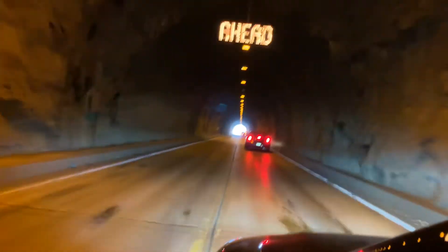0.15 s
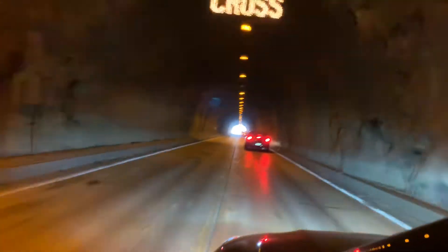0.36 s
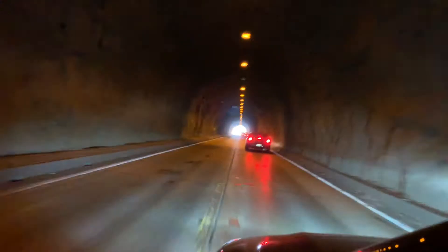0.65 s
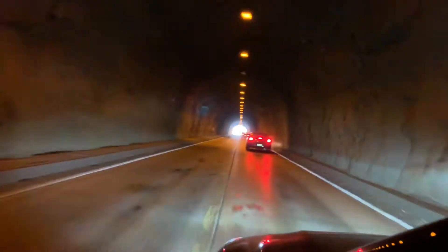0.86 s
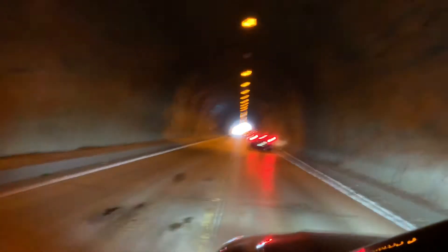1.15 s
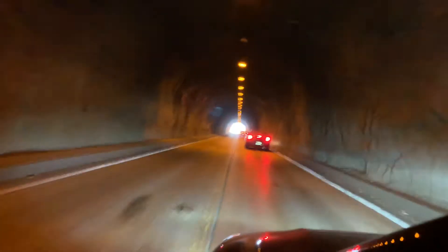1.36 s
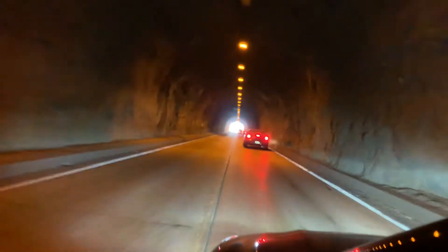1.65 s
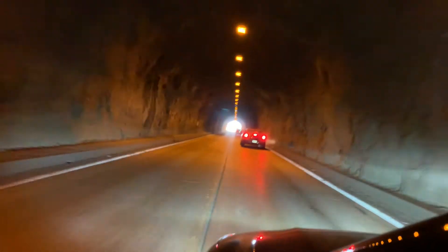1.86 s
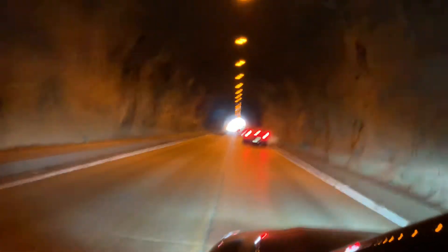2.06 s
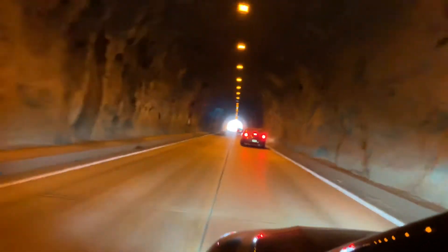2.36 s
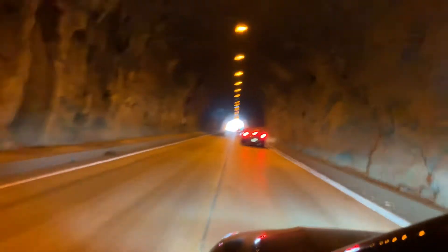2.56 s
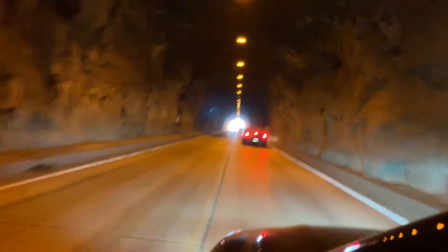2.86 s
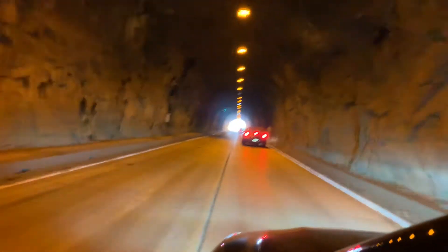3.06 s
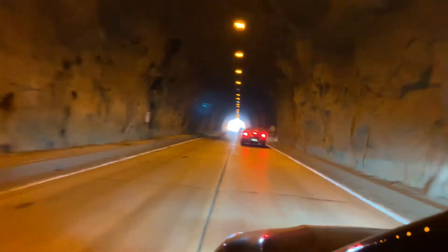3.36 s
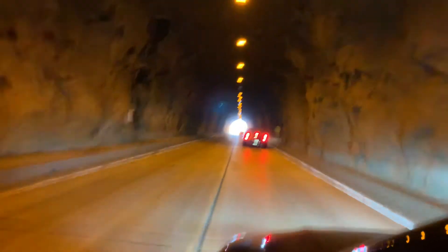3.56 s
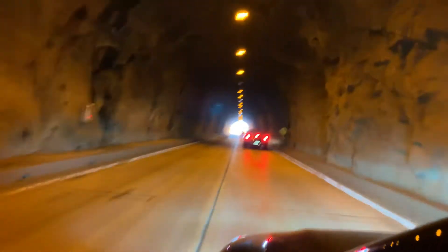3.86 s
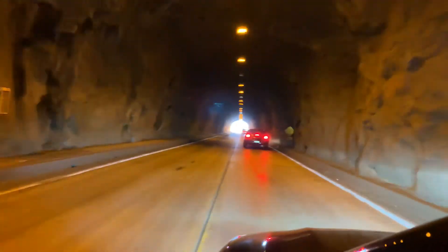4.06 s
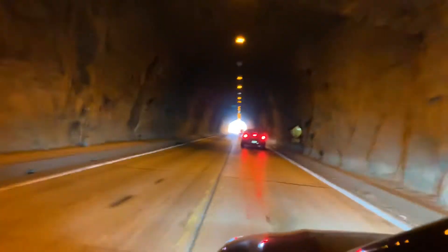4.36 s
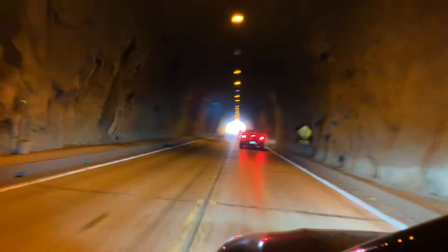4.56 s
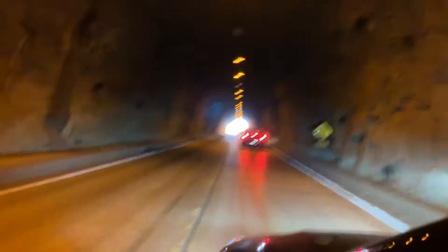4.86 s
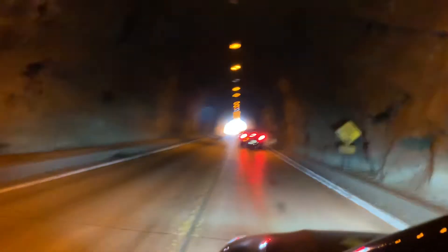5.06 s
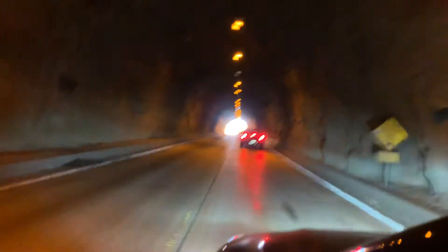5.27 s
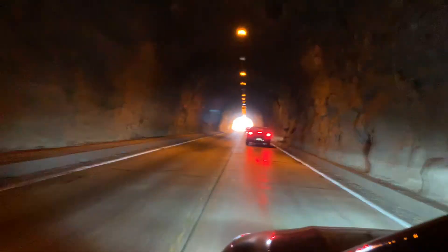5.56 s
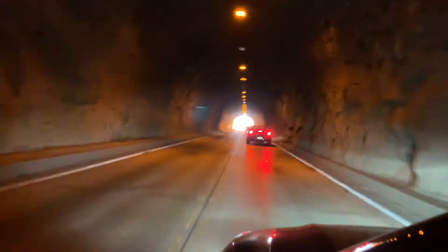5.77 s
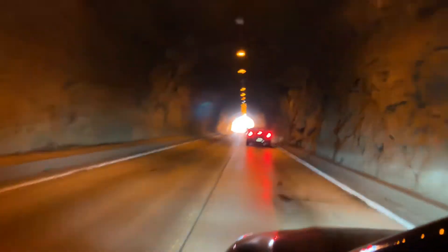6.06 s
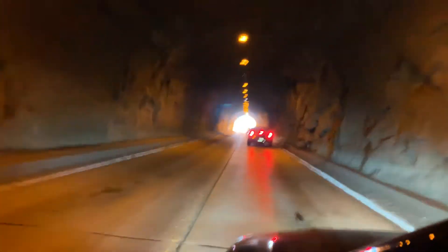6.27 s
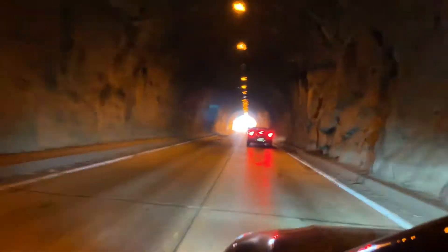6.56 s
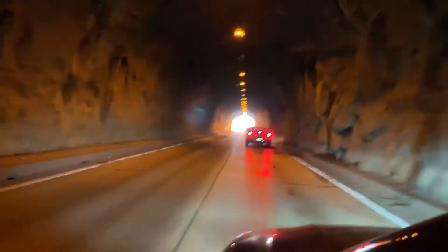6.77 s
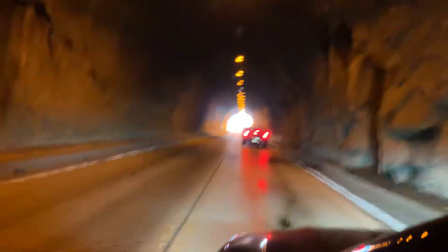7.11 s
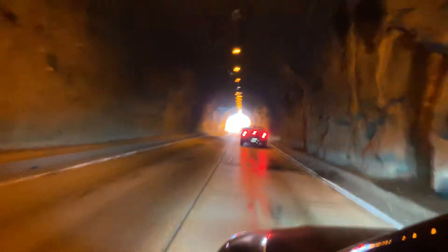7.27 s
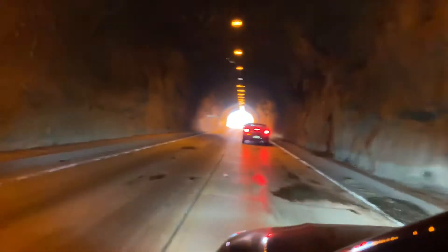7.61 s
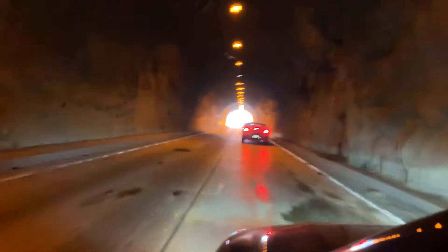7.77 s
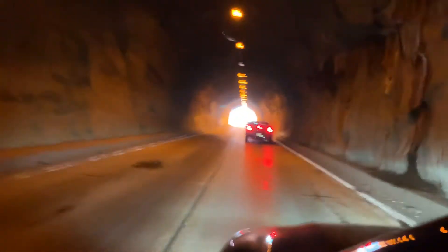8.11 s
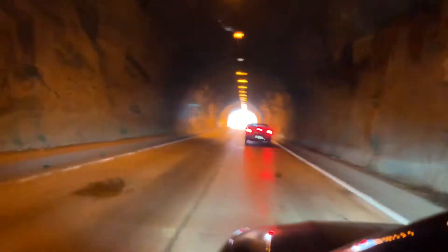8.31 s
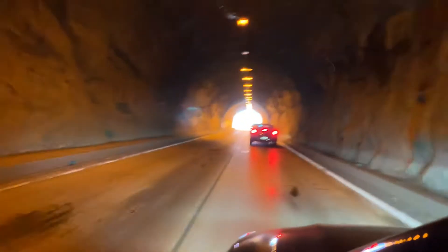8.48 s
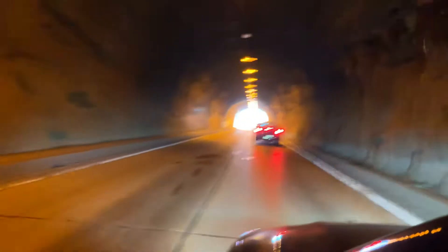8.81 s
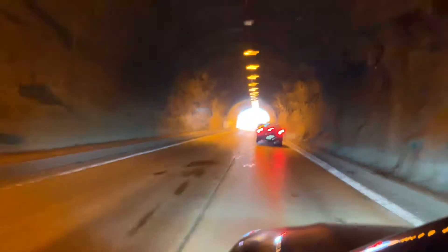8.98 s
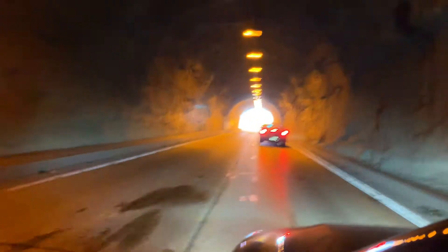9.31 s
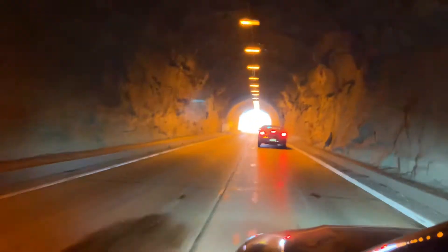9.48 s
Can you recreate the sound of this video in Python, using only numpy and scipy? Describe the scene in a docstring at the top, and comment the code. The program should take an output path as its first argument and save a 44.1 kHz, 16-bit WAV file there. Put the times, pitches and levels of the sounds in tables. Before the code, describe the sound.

Ragged wind batters a microphone on the outside of a moving car, with deep rumble, quick thumps and a thin high hiss that rises with the gusts. Behind it, tyres and engine blend into an even roar reflected by the tunnel walls. Sharp crackling snaps mark the hardest hits, the strongest about two and a half and six seconds in. Tiny dry ticks of grit are barely heard from about three seconds on.

```python
"""Slipstream buffets a microphone outside a car in a rock tunnel: low lumps, gusts, a thin whistle past
the port and short eddies that drop in pitch, some of the hardest with a snap of the diaphragm.
Fine grit ticks on the housing. Tyre and engine roar comes back off the walls as a smooth wash."""
import sys
import numpy as np
from scipy import signal
from scipy.fft import rfft, irfft, next_fast_len
from scipy.io import wavfile
from scipy.ndimage import uniform_filter1d, minimum_filter1d, map_coordinates

SR = 44100
rng = np.random.default_rng(int(sys.argv[2]) if len(sys.argv) > 2 else 0)


def pcm_store(signal):
    """Save signal as 16-bit PCM."""
    levels = np.round(np.clip(np.atleast_2d(signal), -1, 1) * 32767)
    wavfile.write(sys.argv[1], SR, levels.astype(np.int16).T)


N = 425565


def amp(db):
    """Decibels to gain."""
    return 10 ** (np.asarray(db) / 20)


def unit(x):
    """x at rms 1."""
    return x / np.sqrt(np.mean(x ** 2) + 1e-20)


def curves(rows):
    """Per-sample curve for each column after time_s."""
    time_s, *columns = np.transpose(rows)
    return [np.interp(np.arange(N) / SR, time_s, column) for column in columns]


def wobble(rate_hz):
    """Smooth random curve, rate_hz knots a second."""
    knots = rng.standard_normal(int(N * rate_hz / SR) + 4)
    return map_coordinates(knots, [np.arange(N) * rate_hz / SR])


def filtered(x, response):
    """FFT filter with gain response(hz)."""
    size = next_fast_len(N + 8192)
    return irfft(rfft(x, size) * response(np.fft.rfftfreq(size, 1 / SR)), size)[..., :N]


def band(hz, centre_hz, width_hz):
    """Response of one resonance."""
    return 1j * hz * width_hz / (centre_hz ** 2 - hz ** 2 + 1j * hz * width_hz)


def rush(spectrum, patchy_db):
    """Shaped noise at rms 1, with random gain patches in time and frequency."""
    bins = signal.stft(rng.standard_normal(N + 512), nperseg=512)[2]
    patches = uniform_filter1d(rng.standard_normal(bins.shape), size=8, axis=0)
    patches = uniform_filter1d(patches, size=6, axis=1)
    noise = signal.istft(bins * amp(patchy_db * unit(patches)), nperseg=512)[1][:N]
    freq_hz, density_db = np.transpose(spectrum)
    response = lambda hz: amp(np.interp(np.log(hz + 1), np.log(freq_hz + 1), density_db, -120, -120))
    return unit(filtered(noise, response))


def click_envelope(t60_s):
    """Fast rise, exponential decay: 400 samples, peak 1."""
    t = np.arange(400) / SR
    envelope = amp(-60 * t / t60_s) * (1 - np.exp(-t / .0007))
    return envelope / envelope.max()


def road_and_buffet(flow):
    """Tyre and engine noise, steady as a tunnel's wash, over low lumps of air pressure."""
    drive = [(0.0, -26, -39, -19), (0.9, -25.5, -38.5, -19), (2.1, -25, -39.5, -17.5),
             (3.15, -25.5, -39.5, -19), (4.5, -24.5, -39, -18.5), (5.1, -23, -39.5, -17.5),
             (5.6, -25, -39.5, -17.5), (6.0, -24.5, -38.5, -16.5), (6.9, -25.5, -41, -18.5),
             (8.8, -26.5, -46, -19.5), (9.65, -26.5, -46, -19)]  # time_s, roar_db, tyre_db, buffet_db
    # freq_hz, density_db
    roar_spectrum = [(60, -59), (150, -11.5), (300, -2), (600, -3.5), (1100, -1), (1500, -5), (2100, -8.5),
                     (3200, -24), (5000, -45)]
    tyre_spectrum = [(1200, -38), (2100, 2.5), (3200, -4), (4200, -9.5), (5500, -20.5), (9000, -46.5)]
    buffet_spectrum = [(12, -42), (22, -7.5), (35, -3), (54, -1), (75, -3.5), (130, -6.5), (300, -14.5),
                       (700, -34)]
    roar_db, tyre_db, buffet_db = curves(drive)
    roar = amp(roar_db + .43 * flow) * rush(roar_spectrum, patchy_db=.42)
    tyres = amp(tyre_db + .39 * flow + .26 * wobble(11)) * rush(tyre_spectrum, patchy_db=.94)
    buffet = amp(buffet_db + .68 * flow) * rush(buffet_spectrum, patchy_db=.62)
    return roar + tyres + buffet


def grit_ticks():
    """Grit hits the housing: dry treble ticks."""
    impacts = [(3.1108, -54), (3.3149, -54), (3.4635, -54), (3.4845, -52), (3.539, -52), (4.4009, -55),
               (4.5052, -53), (5.9803, -49), (6.4837, -55), (6.9057, -53), (6.9396, -52), (7.3826, -55),
               (7.5627, -52), (8.1215, -46), (8.1798, -52), (8.3983, -56), (9.0109, -52), (9.3891, -52),
               (9.3955, -52)]  # start_s, level_db
    grit = np.zeros(N + 400)
    for start_s, level_db in impacts:
        tick = amp(level_db) * click_envelope(t60_s=.009) * rng.choice([-1, 1], 400)
        grit[round(start_s * SR):][:400] += tick
    return filtered(grit[:N], lambda hz: band(hz, 11000, 12000) ** 3)


def diaphragm_snaps():
    """Each snap rings the port for a few unsteady cycles, with a rattle on top."""
    snaps = [(2.384, -8.5, 2490, -21), (2.389, -15, 1980, -15), (2.398, -32, 2400, -14),
             (2.41, -13.5, 1510, -22), (3.539, -18, 1500, -20), (5.576, -17, 1290, -30),
             (5.7678, -22, 3360, -19), (5.793, -20, 2340, -16), (5.9805, -9, 2290, -18),
             (5.989, -19, 3300, -23), (5.9928, -20.5, 4230, 1.5), (5.9949, -15, 2140, -22),
             (8.8179, -15, 2410, -19.5)]  # start_s, level_db, ring_hz, rattle_rel_db
    ring, rattle = np.zeros((2, N + 400))
    t = np.arange(400) / SR
    for start_s, level_db, ring_hz, rattle_rel_db in snaps:
        at = round(start_s * SR)
        tone = np.sin(2 * np.pi * ring_hz * t + np.cumsum(rng.normal(0, .3, 400)))
        noise = rng.choice([-1, 1], 400)
        ring[at:at + 400] += amp(level_db) * click_envelope(t60_s=.012) * tone
        rattle[at:at + 400] += amp(level_db + rattle_rel_db) * click_envelope(t60_s=.0096) * noise
    return (filtered(ring[:N], lambda hz: 1 / (1 + (hz / 5500) ** 8))
            + filtered(rattle[:N], lambda hz: band(hz, 4600, 6000) ** 2 / (1 + (hz / 8500) ** 12)))


def gust_levels():
    """Turbulence and whistle levels in dB: each gust swells, holds and dies over the breeze."""
    breeze = [(0.0, -25, -58), (0.5, -30.5, -57.5), (0.8, -24.5, -54.5), (1.2, -32.5, -58.5),
              (1.8, -23, -55), (2.4, -31.5, -57), (3.0, -24.5, -54.5), (3.45, -29.5, -58),
              (3.8, -26.5, -55), (4.5, -28.5, -56.5), (4.95, -23.5, -53), (5.2, -27, -57),
              (5.85, -26.5, -53.5), (6.4, -21, -55), (6.95, -27, -57.5), (7.45, -25, -57.5),
              (7.9, -29.5, -62), (8.5, -24.5, -61), (9.1, -29, -60), (9.65, -33, -60.5)]  # time_s, turbulence_db, whistle_db
    gusts = [(0.04, -17, 10, 42, 5), (0.36, -22, 17, 100, 4), (0.66, -11, 12, 19.5, 5),
             (0.83, -25, 30, 60, 3.5), (1.25, -20.5, 50, 91, 3), (1.52, -13.5, 8.3, 40, 3.5),
             (1.79, -23, 15, 50, 1), (1.96, -20, 38, 74, 0.5), (2.38, -14.5, 16, 28, 2),
             (2.56, -19.5, 44, 80, 0.5), (3.16, -27.5, 22, 120, -1), (3.525, -12, 45, 30, 9),
             (3.67, -21.5, 10, 70, -2), (3.75, -21.5, 57, 92, 2.5), (4.29, -20.5, 17, 27, 3),
             (4.44, -21, 20, 120, 1.5), (5.08, -17, 16, 28, 2), (5.27, -13.5, 40, 27, 3.5),
             (5.5, -23.5, 20, 52, 0.5), (5.78, -14.5, 30, 35, 2.5), (5.984, -4.5, 11, 18, -2),
             (6.02, -15, 25, 59, 2.5), (6.98, -15.5, 25, 50, 4), (7.57, -15.5, 8.4, 15, 0),
             (7.72, -21, 10, 120, 1), (8.024, -14, 106, 21, 3), (8.158, -16.5, 17, 18, 6),
             (8.64, -20, 15, 70, 0), (8.8, -26, 25, 80, 0.5), (9.0, -19, 31, 35, 3),
             (9.38, -23, 62, 30, 0.5)]  # peak_s, level_db, hold_ms, fall_10db_ms, whistle_lift_db
    rise_to_fall = .41
    breeze_db, whistle_db = curves(breeze)
    power, t = amp(2 * breeze_db), np.arange(N) / SR
    for peak_s, level_db, hold_ms, fall_10db_ms, lift_db in gusts:
        away_s = np.maximum((peak_s - t) / rise_to_fall, t - peak_s - hold_ms / 1000)
        drop_db = 10 * np.maximum(0, away_s) / (fall_10db_ms / 1000)
        power = power + amp(2 * (level_db - drop_db))
        whistle_db = whistle_db + lift_db * amp(-drop_db)
    return 10 * np.log10(power), whistle_db


def port_whistle(whistle_db, flow, ragged):
    """Air past the port: a thin hiss, with the finest jets fizzing in spurts."""
    # freq_hz, density_db
    hiss_spectrum = [(2500, -17.5), (4500, -1.5), (6000, -3), (8000, -5.5), (9500, -14.5), (11000, -28)]
    fizz_spectrum = [(6000, -20), (9000, 0), (11000, -1.5), (14500, -1.5), (16000, -5.5)]
    hiss = unit(amp(.5 * ragged + 1.4 * flow) * rush(hiss_spectrum, patchy_db=1.3))
    fizz = unit(amp(1.8 * flow + .6 * wobble(20)) * rush(fizz_spectrum, patchy_db=1.0))
    return amp(whistle_db) * hiss + amp(whistle_db - 19.5) * fizz


def vortices(peak_s, level_db, pitch_hz, length_s, fall, rough_rad):
    """Pressure of passing vortices: a few torn cycles, dropping in pitch as each vortex widens."""
    offsets = np.arange(-500, 1300)
    age = offsets / SR / length_s[:, None]  # in lengths from the peak
    taper = np.hanning(2600)[800:]
    envelope = np.exp(-3 * np.minimum(age, 0) ** 2) / (1 + 2 * np.maximum(age, 0) ** 2) * taper
    cycles = (pitch_hz * length_s)[:, None] / fall * (1 - np.exp(-fall * np.maximum(age, -2)))
    tear = uniform_filter1d(rng.standard_normal(age.shape), size=18, axis=1)  # turbulent phase jitter
    phase = 2 * np.pi * (cycles + rng.random((len(peak_s), 1))) + rough_rad * unit(tear)
    waves = amp(level_db)[:, None] * envelope * np.cos(phase)
    at = np.round(peak_s * SR).astype(int)[:, None] + offsets + 500
    pressure = np.bincount(at.ravel(), waves.ravel(), N + 1800)[500:N + 500]
    return filtered(pressure, lambda hz: band(hz, 280, 2800) / (1 + (hz / 1700) ** 4))


def small_eddies(gust_db):
    """Swarm of 900 random eddies, louder in the gusts."""
    when, strength, pitch, length = rng.random((900, 4)).T
    peak_s = when * (N - 1) / SR
    level_db = np.minimum(gust_db[(peak_s * SR).astype(int)] - .3 - 3.7 * np.log(strength + 1e-4), -12)
    pitch_hz = 280 * 5.06 ** (pitch ** 1.71)
    length_s = (1.2 + 1.2 * length) / pitch_hz
    return vortices(peak_s, level_db, pitch_hz, length_s, fall=.6, rough_rad=.5)


def strong_eddies():
    """Single hard eddies, each with a lower thump from the air mass behind it."""
    eddies = [(0.021, -9.5, 530, 4.3), (0.047, -18, 536, 6.5), (0.296, -7.5, 432, 3.5),
              (0.357, -11, 470, 5.8), (0.631, -9.5, 380, 5.7), (0.673, -11, 377, 6.4),
              (0.743, -12, 590, 6.6), (0.844, -14.5, 420, 9), (1.242, -12.5, 520, 8.5),
              (1.283, -13, 675, 5), (1.468, -10, 473, 6.6), (1.531, -10.5, 433, 10), (1.802, -10, 560, 3),
              (1.962, -10, 390, 4.3), (1.991, -9, 430, 2.6), (2.094, -10, 497, 7.3),
              (2.293, -8.5, 423, 8.7), (2.362, -10, 570, 3.8), (2.387, 6.5, 410, 5), (2.398, -5, 330, 5.3),
              (2.407, -13, 400, 8.2), (2.558, -6, 500, 3), (2.601, -7, 510, 3.2), (2.666, -11.5, 527, 7.8),
              (3.169, -11, 440, 6.1), (3.265, -6, 390, 2.3), (3.415, -11, 400, 4.1), (3.505, -8, 403, 5.3),
              (3.529, -7, 706, 8), (3.542, -2.5, 730, 4.5), (3.557, -6, 450, 3.4), (3.568, -7, 450, 3.2),
              (3.739, -5.5, 367, 4.7), (3.778, -3.5, 515, 3.7), (4.002, -11, 460, 4),
              (4.185, -8.5, 422, 4.5), (4.453, -14.5, 420, 7.6), (4.666, -9, 526, 5.9),
              (4.89, -8, 350, 4.5), (5.082, -6, 397, 4.7), (5.093, -9, 408, 2.7), (5.226, -8.5, 477, 8.6),
              (5.269, -6, 370, 3.2), (5.295, -5, 470, 2.6), (5.317, -9, 460, 5.4), (5.409, -7, 388, 3.2),
              (5.578, 1, 540, 3.1), (5.77, -13, 780, 8), (5.797, -4, 440, 9.1), (5.984, -7, 392, 6.4),
              (5.994, -18, 360, 4), (6.035, -11, 495, 5.7), (6.194, -9.5, 564, 6.6), (6.472, -10, 490, 5.3),
              (6.712, -11.5, 423, 9), (6.985, -10.5, 494, 5.5), (7.051, -9, 340, 3.7),
              (7.318, -7.5, 458, 3.9), (7.414, -10, 560, 5.3), (7.569, -1, 380, 1.8),
              (7.724, -3.5, 385, 2.3), (8.026, -10, 383, 5), (8.047, -3, 363, 7.9), (8.086, -11, 500, 3.4),
              (8.1, -9, 330, 7.2), (8.118, -10, 473, 3.6), (8.133, -11, 340, 2.6), (8.165, -12, 453, 11),
              (8.359, -9.5, 300, 10), (8.479, -9, 400, 5.9), (8.647, -7, 534, 5.2), (8.791, -10, 750, 2.7),
              (8.797, -4, 380, 2.8), (8.821, -0.5, 440, 3.3), (9.008, -4.5, 544, 6.9),
              (9.043, -7.5, 510, 4.4), (9.235, -7.5, 355, 6.5)]  # peak_s, level_db, pitch_hz, length_ms
    peak_s, level_db, pitch_hz, length_ms = np.transpose(eddies)
    cores = vortices(peak_s, level_db, pitch_hz, np.clip(length_ms, 2, 16) / 1000, fall=.7, rough_rad=.45)
    thumps = vortices(peak_s + .00394, level_db - 9, pitch_hz / 2.82, .0048 + length_ms / 1000,
                      fall=.3, rough_rad=.29)
    return cores + thumps


def slipstream(flow):
    """Gusting air at the microphone: ragged turbulence, port whistle and eddies."""
    turbulence_spectrum = [(50, -22.5), (130, 0.5), (300, -4.5), (600, -8), (1000, -12), (1700, -24),
                           (4000, -51)]  # freq_hz, density_db
    gust_db, whistle_db = gust_levels()
    ragged = wobble(70)
    turbulence = amp(gust_db) * unit(amp(3.5 * ragged) * rush(turbulence_spectrum, patchy_db=2.5))
    return turbulence + port_whistle(whistle_db, flow, ragged) + small_eddies(gust_db) + strong_eddies()


def scene():
    """Mono mix; one unsteady air flow modulates road noise, buffet and whistle."""
    flow = unit(wobble(55) + .5 * wobble(28))
    return (road_and_buffet(flow) + slipstream(flow) + diaphragm_snaps() + grit_ticks())[None]


def record(dry):
    """Capsule hiss, peak limiter, band limit."""
    capsule_spectrum = [(5000, -19), (8000, -3.5), (11000, 5), (14500, -1.5), (16000, -4)]  # freq_hz, density_db
    ceiling, top_hz = .97, 15720
    dry = dry + amp(-82) * rush(capsule_spectrum, patchy_db=.6)
    max_gain = np.minimum(1, ceiling / (np.abs(dry) + 1e-9))
    gain = uniform_filter1d(minimum_filter1d(max_gain, size=181, axis=1), size=180, axis=1)
    return filtered(dry * gain, lambda hz: hz < top_hz)


dry = scene()
out = record(dry)
pcm_store(out)
```